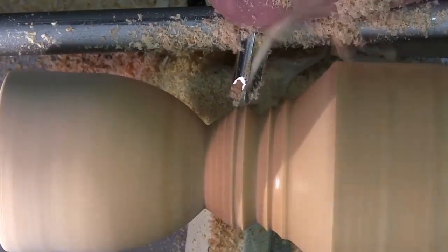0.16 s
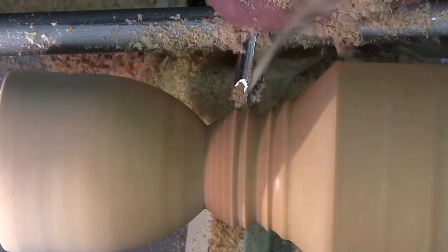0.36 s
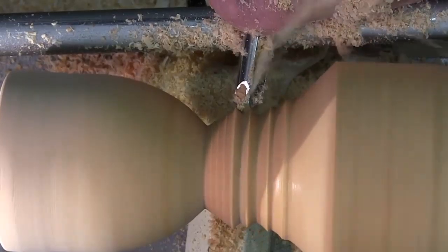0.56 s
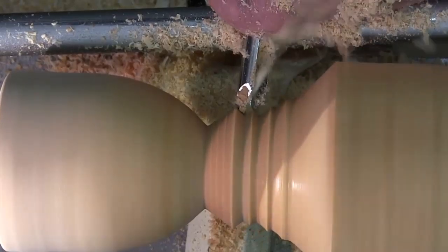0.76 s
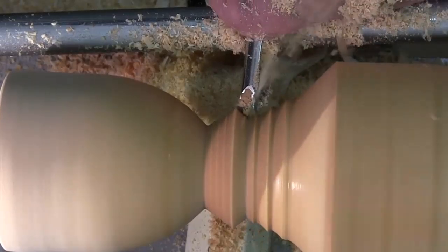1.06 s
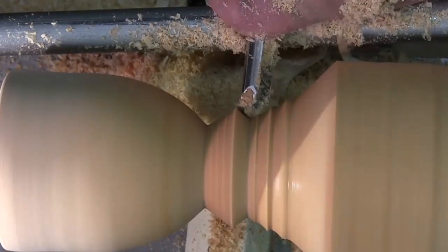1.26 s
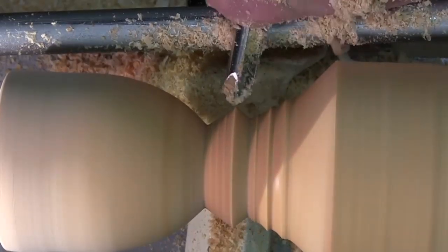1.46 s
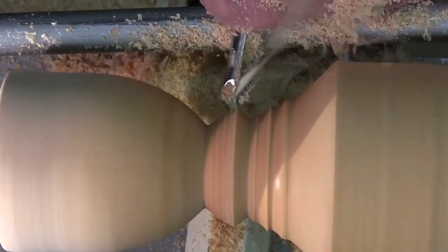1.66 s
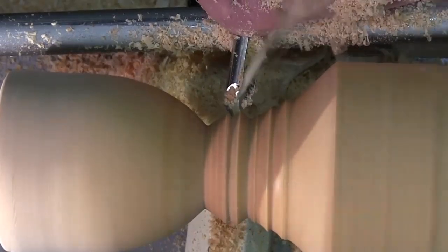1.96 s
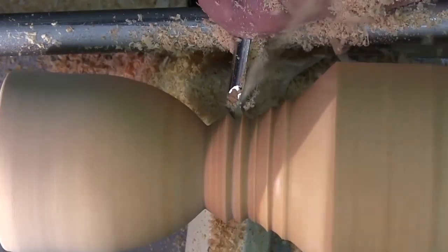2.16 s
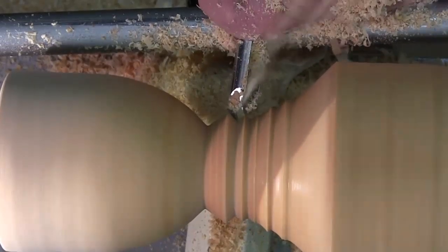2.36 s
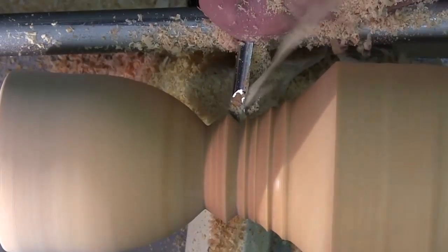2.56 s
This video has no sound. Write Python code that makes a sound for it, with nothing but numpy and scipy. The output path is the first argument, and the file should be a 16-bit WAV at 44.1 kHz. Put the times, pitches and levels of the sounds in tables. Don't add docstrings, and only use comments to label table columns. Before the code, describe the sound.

Close-up wood turning: a continuous tearing, whistly shaving noise with rapid flutter and soft low thumps, stopping abruptly for a moment while the lathe idles, then biting in again, with slight workshop reverberation, in mono.

```python
import sys
import numpy as np
from scipy import signal
from scipy.fft import rfft, irfft, next_fast_len
from scipy.io import wavfile
from scipy.ndimage import uniform_filter1d, minimum_filter1d, map_coordinates

SR = 44100
rng = np.random.default_rng(int(sys.argv[2]) if len(sys.argv) > 2 else 0)


def voltage_ratio(decibels):
    exponent = np.asarray(decibels, float) / 20
    return 10 ** exponent


def pcm_store(signal):
    levels = np.round(np.clip(np.atleast_2d(signal), -1, 1) * 32767)
    wavfile.write(sys.argv[1], SR, levels.astype(np.int16).T)


N = 119070
T_S = np.arange(N) / SR

# [t/s, spin/(turns/s)]
SPIN = [(0.0, 33.53), (0.25, 29.53), (0.42, 20.73), (0.7, 21.43), (1.0, 20.62), (1.25, 23.04),
        (1.48, 24.21), (1.62, 27.34), (1.88, 30.38), (2.1, 23.76), (2.35, 20.95), (2.7, 20.0)]
# [t/s, cutting force/dB, unevenness per turn/dB, thump level/dB, depth of bite/0-1]
CUT = [(0, -65, 15, -53, 0.3), (.035, -35.5, 3, -56.5, 0.66), (.13, -22.5, 12, -66, 0.46),
       (.25, -27.5, 7, -56.5, 0.7), (.43, -23.5, -2.5, -44, 0.82), (.62, -26, 3.5, -46, 0.4),
       (.76, -24.5, -3, -46.5, 0.3), (.83, -26, 3.5, -42.5, 0.4), (.95, -24.5, 2.5, -50.5, 0.23),
       (1.2, -25.5, -1, -52, 0.16), (1.475, -27.5, 8, -48, 0.18), (1.77, -32.5, 10, -75, 0.34),
       (1.85, -25.5, 5, -62, 0.37), (1.92, -21, -2, -52.5, .4), (2.03, -24, 5.5, -52, 0.56),
       (2.27, -23.5, -5, -71, 0.46), (2.36, -25.5, 4, -61, 0.2), (2.7, -26, 0, -47, 0.18)]


def unit(x):
    return x / np.sqrt(np.mean(x ** 2) + 1e-20)


def along(points, hz):
    f, v = np.transpose(points)
    return np.interp(np.log(hz + 1), np.log(f + 1), v)


def curves(rows):
    s, *cols = np.transpose(rows)
    return [np.interp(T_S, s, c) for c in cols]


def wobble(knots_per_s):
    return map_coordinates(rng.standard_normal(4000), [T_S * knots_per_s])


def filtered(x, response):
    m = next_fast_len(N + SR // 2)
    return irfft(rfft(x, m) * response(np.fft.rfftfreq(m, 1 / SR)), m)[..., :N]


def shaped_by(points):
    return lambda f: voltage_ratio(along(points, f))


def highpass(f, corner_hz):
    return 1j * f / (corner_hz + 1j * f)


def body(modes):
    def response(f):
        total = 0
        for k, (centre_hz, width_hz, db) in enumerate(modes):
            damping = 1j * f * width_hz
            total = total + (-1) ** k * voltage_ratio(db) * damping / (centre_hz ** 2 - f * f + damping)
        return total
    return response


def turns():
    start_turn = -.19
    return start_turn + np.cumsum(curves(SPIN)[0]) / SR


def spindle_orders():
    # [multiple of the spin, level/dB]
    orders = [(2, -58), (3, -61)]
    angle = turns()
    total = np.zeros(N)
    for k, db in orders:
        total += voltage_ratio(db + 2.4 * wobble(9.4)) * np.sin(2 * np.pi * (k * angle + rng.random()))
    return total


def rocking_stand():
    # [t/s, sway level/dB]
    sway = [(0, -37.5), (.12, -49), (.2, -46), (.7, -62), (1.1, -68), (1.45, -49.5), (1.58, -43.5),
            (1.9, -49), (2.3, -53), (2.7, -67)]
    rock_hz, drift_rad = 30.5, 0.9
    rock = np.sin(2 * np.pi * rock_hz * T_S + drift_rad * wobble(5.9))
    return voltage_ratio(curves(sway)[0] + 0.83 * wobble(7.3)) * rock


def bearing_hum():
    # [f/Hz, level/(dB per Hz)]
    hum_spectrum = [(20, -32), (90, -13.5), (200, -24.5), (700, -28.5), (1580, -37), (2040, -28.5),
                    (6500, -46.5), (9500, -95)]
    hum_db = -55
    return voltage_ratio(hum_db) * unit(filtered(rng.standard_normal(N), shaped_by(hum_spectrum)))


def guard_ring():
    whine_hz, glide_hz_per_s, whine_db = 950, 300, -59
    centre_s, span_s = 1.62, .05
    since_s = T_S - centre_s
    cycles = whine_hz * T_S + glide_hz_per_s / 2 * since_s ** 2
    swell = np.exp(-(since_s / span_s) ** 2)
    return voltage_ratio(whine_db + 1.2 * wobble(37.5)) * swell * np.sin(2 * np.pi * cycles)


def lathe():
    return spindle_orders() + rocking_stand() + bearing_hum() + guard_ring()


def thumps():
    # [f/Hz, width/Hz, level/dB]
    bed = [(117, 43, 11.5), (267, 240, -20)]
    echo_turn, echo_db = .75, -8
    level_db, angle = curves(CUT)[2], turns()
    hits = np.zeros(N)
    for place, db in ((0, 0), (echo_turn, echo_db)):
        lap = np.floor(angle - place)
        passed = np.diff(lap, prepend=lap[0]) > 0
        hits += passed * voltage_ratio(db + 1.1 * wobble(24.6))

    def soft_bed(f):
        return body(bed)(f) / (1 + 1j * f / 400) ** 2 * highpass(f, 60) ** 4
    return voltage_ratio(level_db) * unit(filtered(hits, soft_bed))


def tearing():
    fibres_per_s, spread_db, snap_share = 1500, 3.5, 0.47
    cap = 1.32
    when = rng.random(N) < fibres_per_s / SR
    size = voltage_ratio(spread_db * np.minimum(rng.exponential(size=N), cap))
    snaps = when * size * rng.choice([-1, 1], N)
    return np.sqrt(snap_share) * unit(snaps) + np.sqrt(1 - snap_share) * rng.standard_normal(N)


def hard_spot():
    catch_turn, rise_turns, fall_turns = -.045, .015, .1
    u = (turns() - catch_turn) % 1
    spot = (1 - np.exp(-u / rise_turns)) * np.exp(-u / fall_turns)
    return spot / spot.max()


def edge_contact():
    lift_s, lift_db_per_s = 1.482, 898
    enter_s, enter_rise_s = 1.766, 0.011
    leaving = voltage_ratio(-lift_db_per_s * np.maximum(T_S - lift_s, 0))
    entering = np.clip((T_S - enter_s) / enter_rise_s, 0, 1)
    return np.where(T_S < enter_s, leaving, entering)


def gouge():
    blade_modes = [(1676, 17, -15), (2007, 128.2, 2.5), (2267, 157, -1.5), (2583, 117.7, -1),
                   (2782, 68.3, -0.5), (2926, 76, -8.5), (3227, 38, -1.5), (3370, 45, -19.5)]
    buried_modes = [(2870, 195, 0), (3454, 28, 2.5), (3584, 47, 0), (3874, 145, -8)]
    edge_modes = [(4053, 114, 4), (4336, 140, 4), (4593, 83, 4), (4820, 44, 1.5), (4950, 77, 1.5),
                  (5980, 250, 0.5), (6624, 330, -1), (7170, 83, -3), (8400, 300, -18), (9940, 510, -8),
                  (11210, 730, -12)]
    rest_modes = [(260.6, 48, -26), (447, 32, -20.5), (579.7, 51, -19.5), (721.3, 20.3, -19),
                  (999, 56, -18), (1289, 39, -18), (1542, 58, -16.5)]
    # [f/Hz, level/(dB per Hz)]
    shaving_spectrum = [(60, -47), (130, -16.5), (250, -11), (372, -19.5), (1400, -15.5), (2690, -12.5),
                        (3760, -23), (11000, -57.5)]
    buried_db, edge_db, rest_db, shaving_db = -8, -19.5, -21, -16.5
    rest_load_db, free_turns_per_s = 0.64, 23.9
    calm = .5

    force_db, uneven_db, _, bite = curves(CUT)
    spot = hard_spot()
    flutter_db = 0.37 * wobble(6.915) + 0.46 * wobble(35.26) + 0.85 * wobble(160)
    force = edge_contact() * voltage_ratio(force_db + 1.28 * uneven_db * (spot - spot.mean()) + flutter_db)

    def layer(response, wobble_db):
        drive = force * voltage_ratio(wobble_db * wobble(14)) * tearing()
        return filtered(drive, response) / np.std(filtered(rng.standard_normal(N), response))

    blade = layer(lambda f: body(blade_modes)(f) * highpass(f, 1500) ** 2, 0.39)
    buried = layer(lambda f: body(buried_modes)(f) * highpass(f, 2500) ** 2, 1.0)
    edge = layer(body(edge_modes), 0.57)
    rest = layer(body(rest_modes), 1.26)
    shaving = layer(shaped_by(shaving_spectrum), 0.46)

    calm_db = calm * uneven_db * spot
    load_db = rest_load_db * (free_turns_per_s - curves(SPIN)[0])
    return (blade + voltage_ratio(buried_db) * bite * buried + voltage_ratio(edge_db - calm_db) * edge
            + voltage_ratio(rest_db + load_db) * rest + voltage_ratio(shaving_db - calm_db) * shaving)


def shop(x):
    # [f/Hz, t60/s]
    near_t60 = [(200, 0.36), (2000, 0.19), (10000, 0.2)]
    far_db, far_longer, far_top_hz = -16.5, 4, 5000
    hz, t, z = signal.stft(rng.standard_normal(SR // 2), SR, nperseg=256)
    fall_db = -60 * t / along(near_t60, hz)[:, None]
    far = voltage_ratio(far_db + fall_db / far_longer) / (1 + (hz[:, None] / far_top_hz) ** 4)
    tail = signal.istft(z * (voltage_ratio(fall_db) + far), SR, nperseg=256)[1]
    delayed = np.pad(x, (400, 0))
    return signal.fftconvolve(delayed, tail / np.linalg.norm(tail))[:N]


def scene():
    shop_db = -12.5
    cut = gouge()
    return (cut + voltage_ratio(shop_db) * shop(cut) + thumps() + lathe())[None]


def top_cut(x):
    return signal.sosfilt(signal.butter(12, 11420, fs=SR, output="sos"), x)


def record(dry):
    ceiling, hold_s, top_hz = 0.3, 0.0028, 10850
    span = int(hold_s * SR)
    needed = np.minimum(1, ceiling / (np.abs(dry) + 1e-9))
    held = minimum_filter1d(needed, size=2 * span + 1, axis=1)
    gain = uniform_filter1d(held, size=span, axis=1)
    return top_cut(filtered(dry * gain, lambda f: f < top_hz))


dry = scene()
out = record(dry)
pcm_store(out)
```